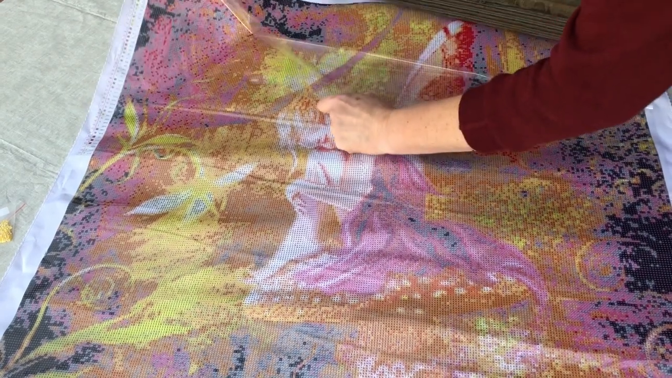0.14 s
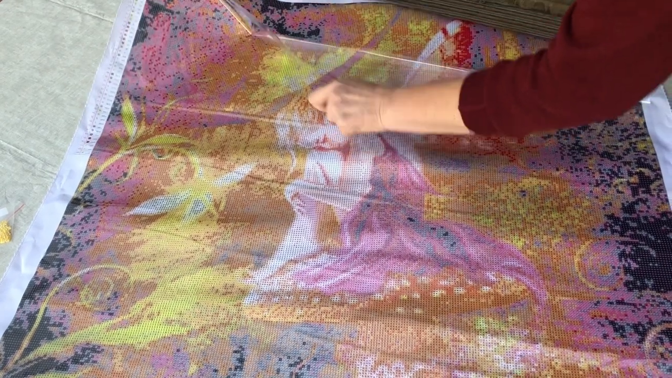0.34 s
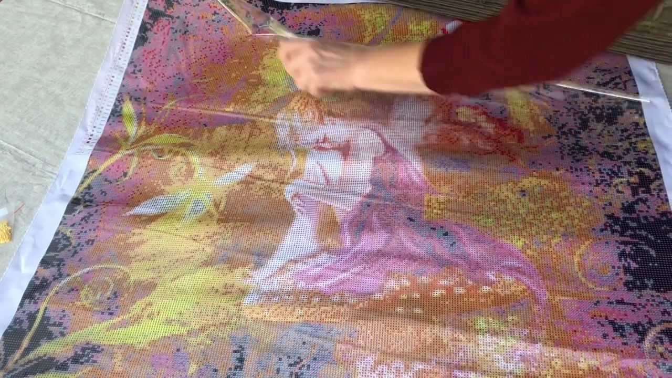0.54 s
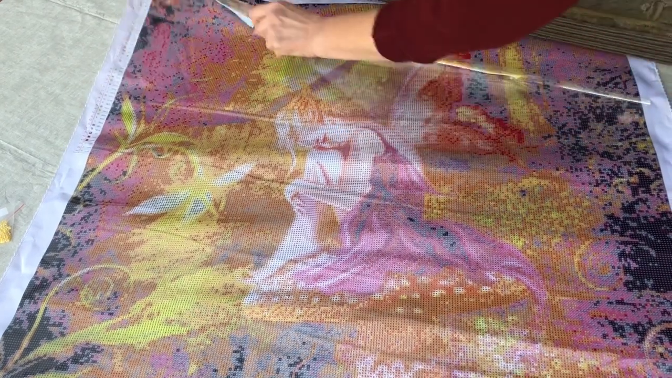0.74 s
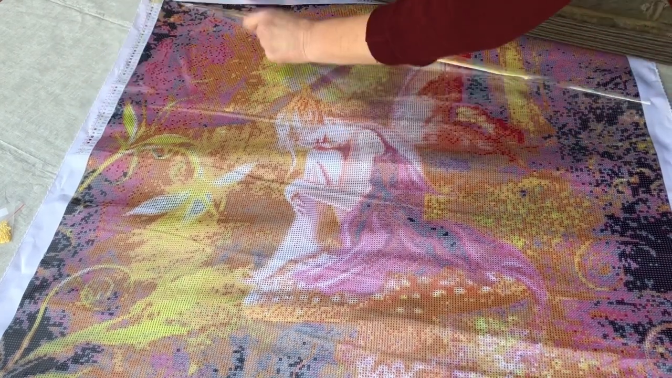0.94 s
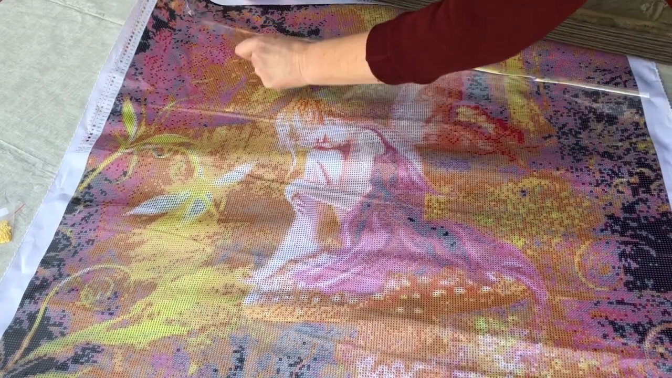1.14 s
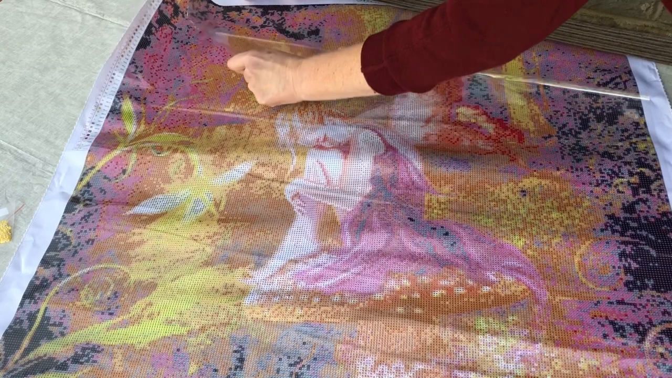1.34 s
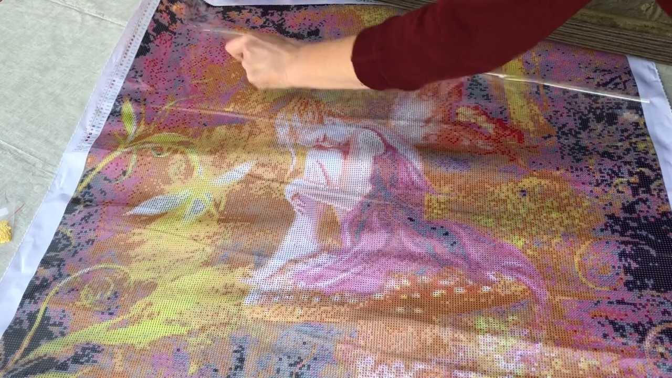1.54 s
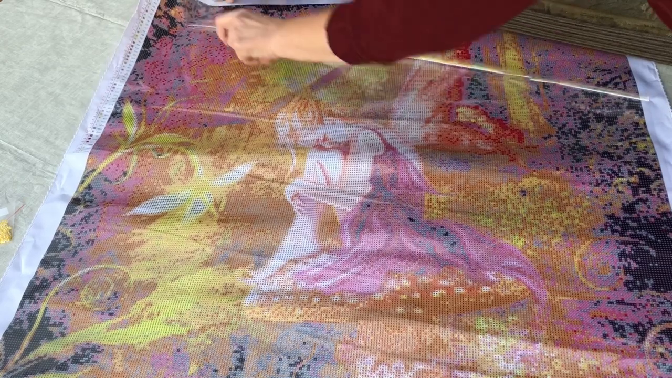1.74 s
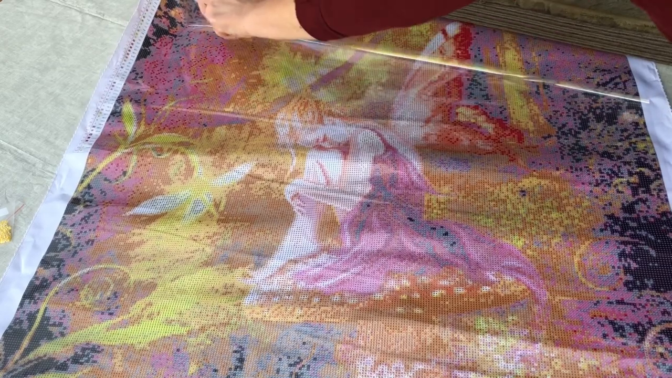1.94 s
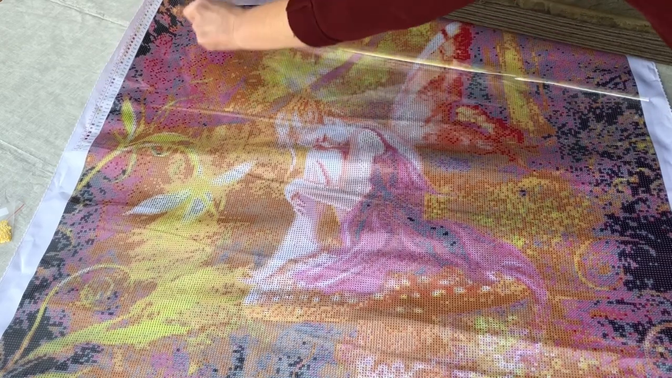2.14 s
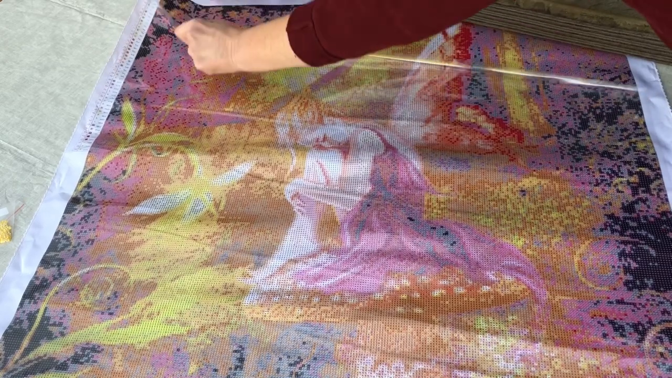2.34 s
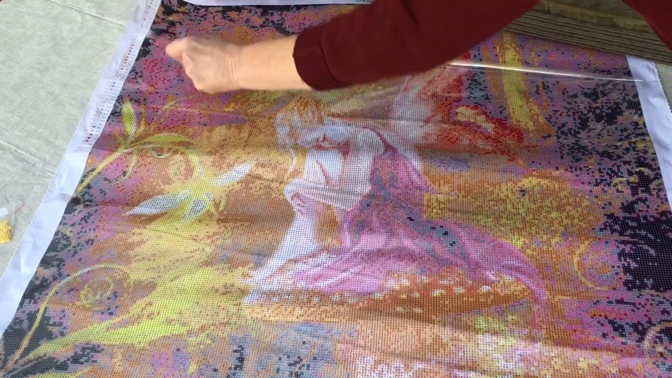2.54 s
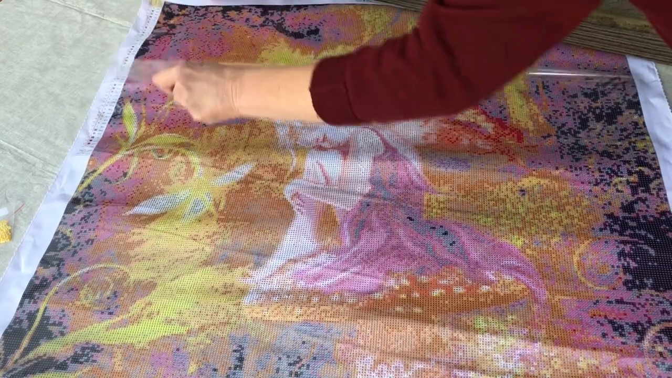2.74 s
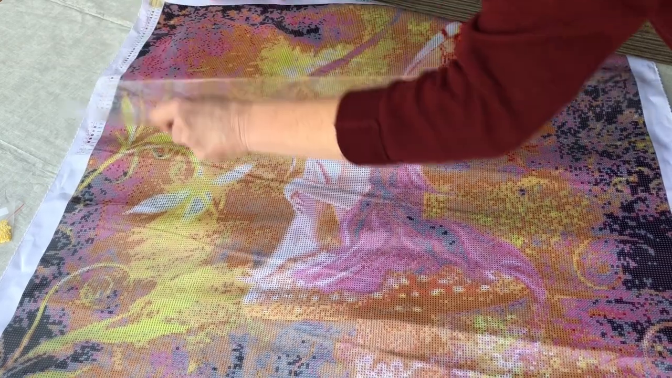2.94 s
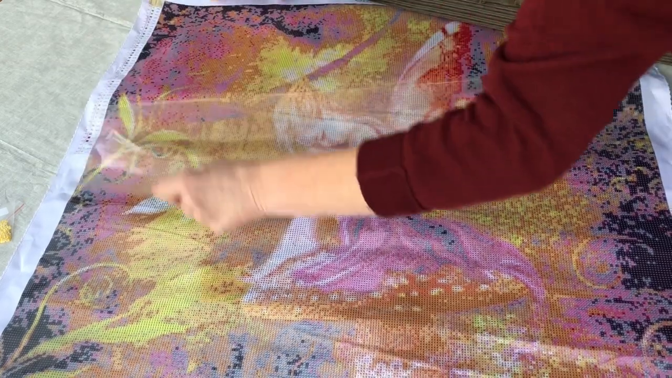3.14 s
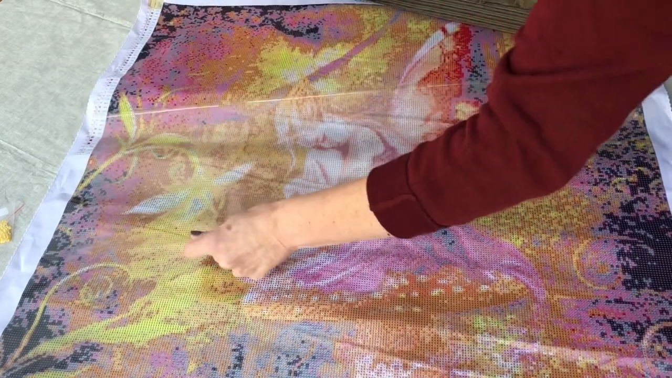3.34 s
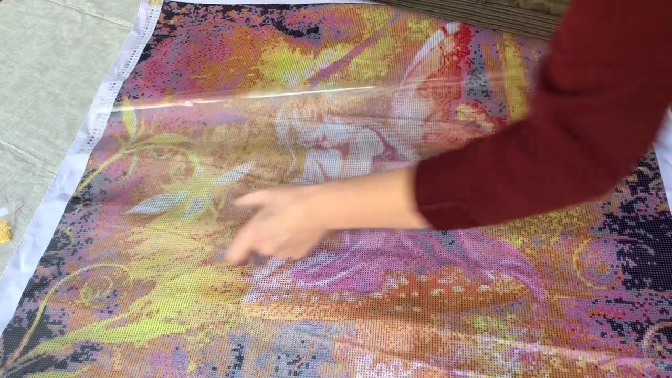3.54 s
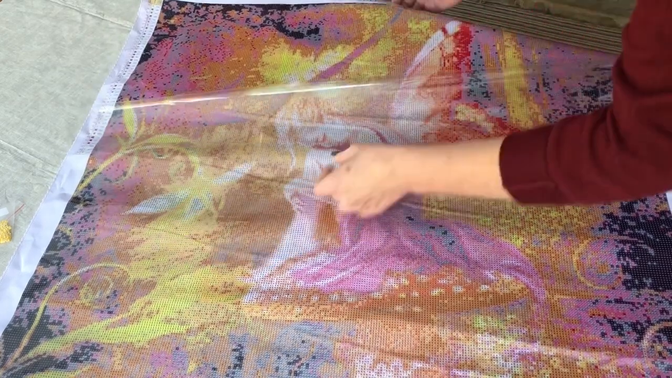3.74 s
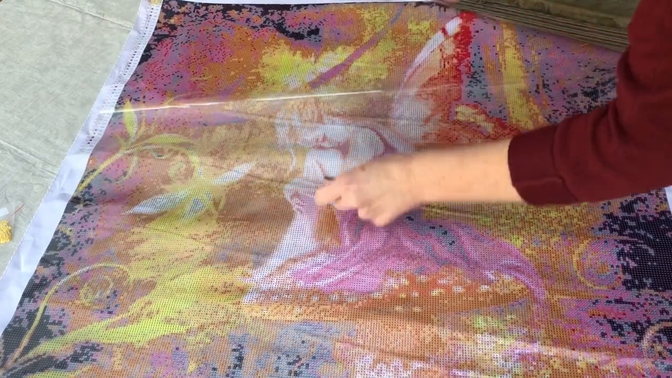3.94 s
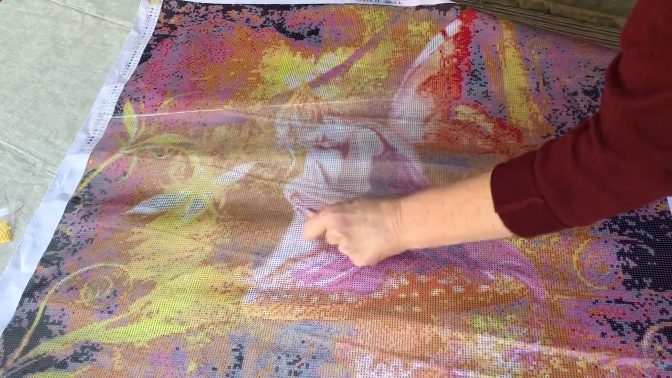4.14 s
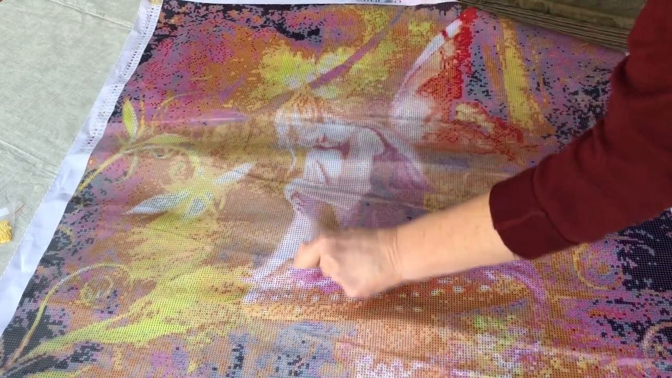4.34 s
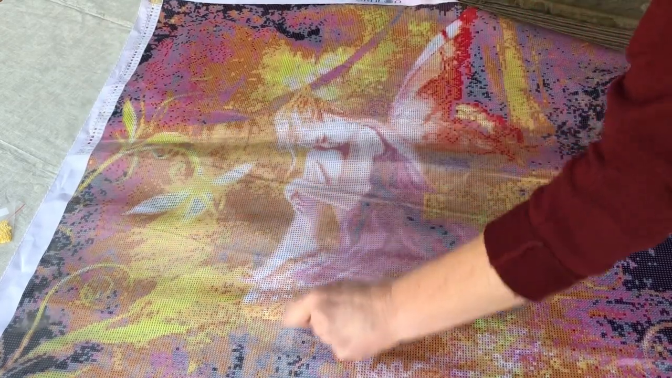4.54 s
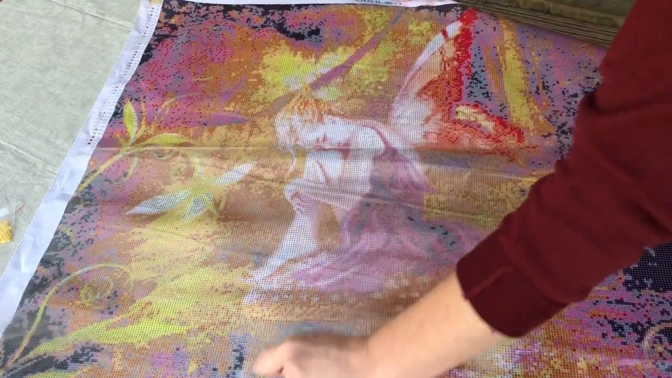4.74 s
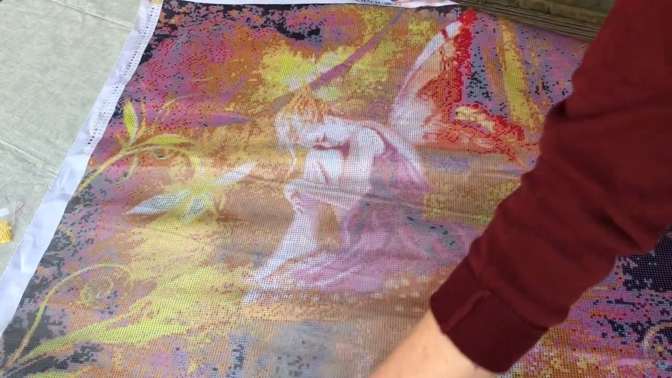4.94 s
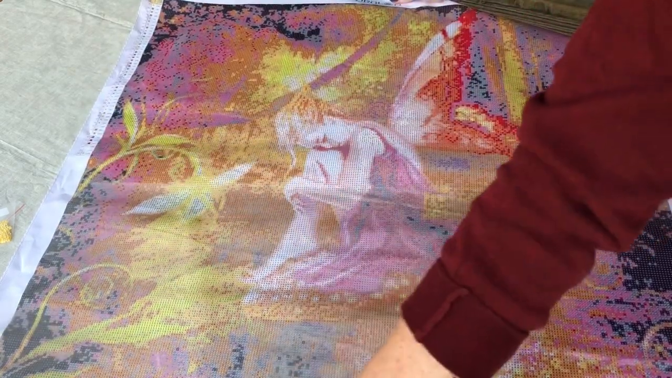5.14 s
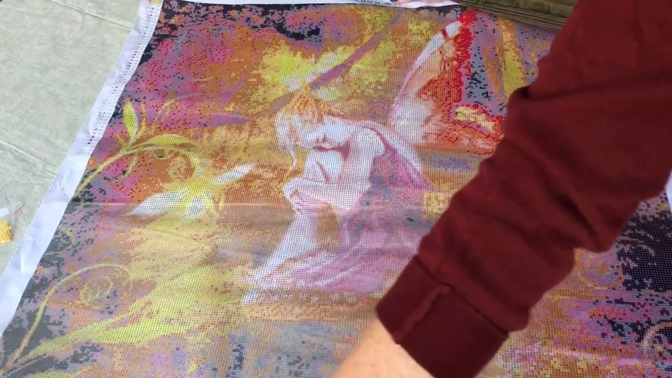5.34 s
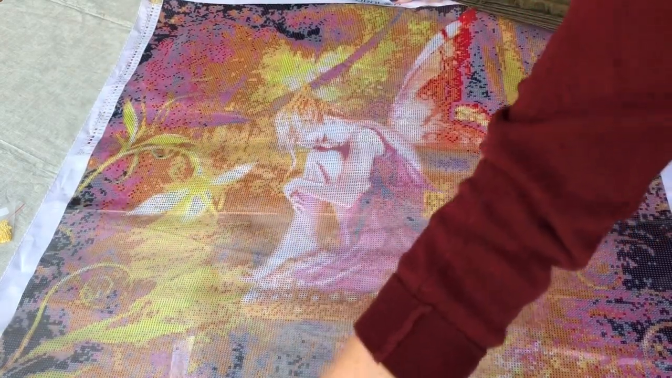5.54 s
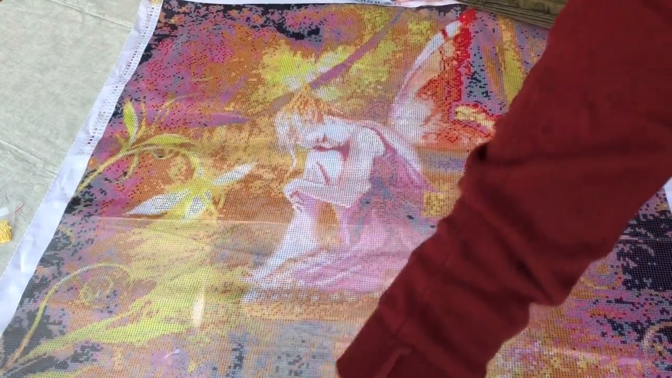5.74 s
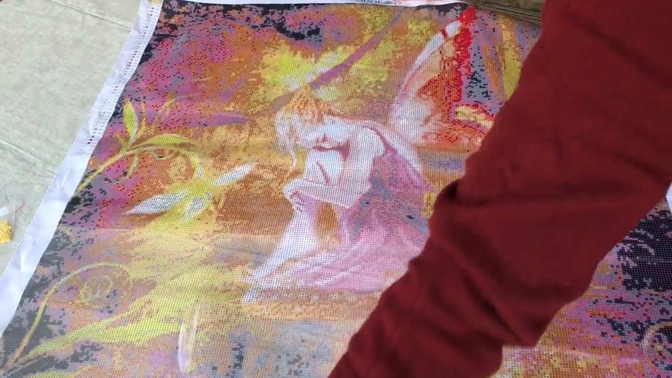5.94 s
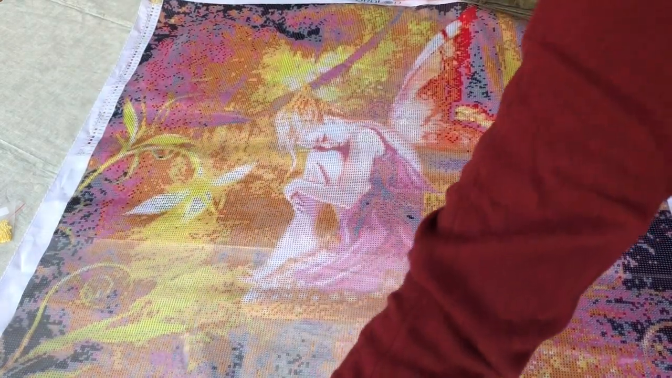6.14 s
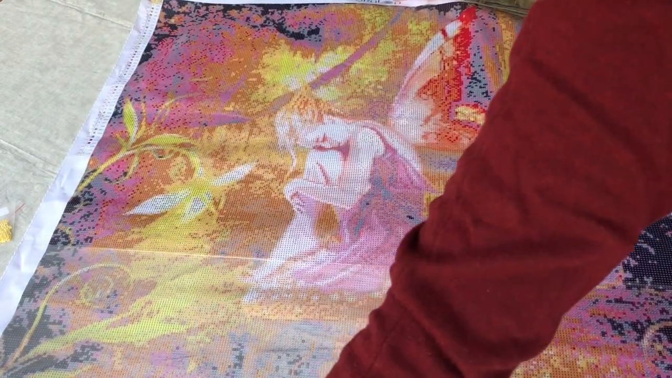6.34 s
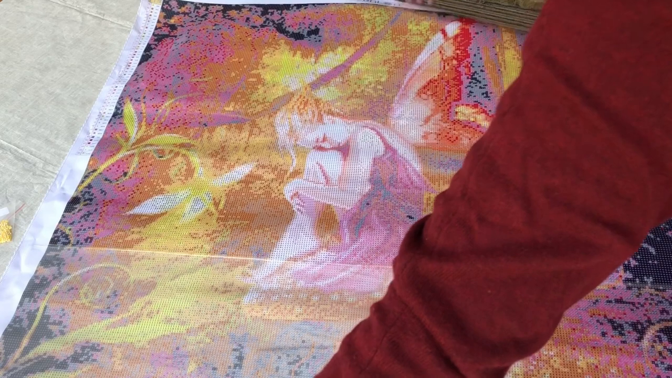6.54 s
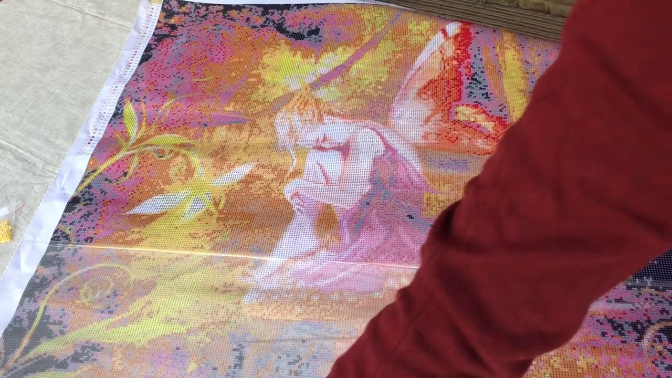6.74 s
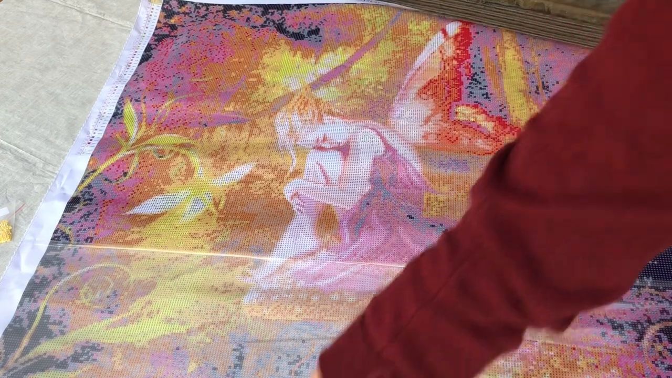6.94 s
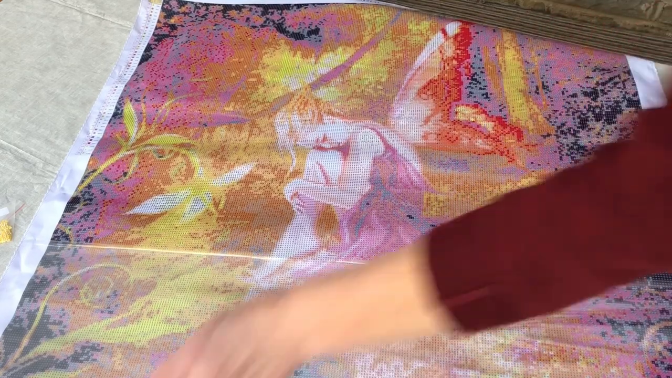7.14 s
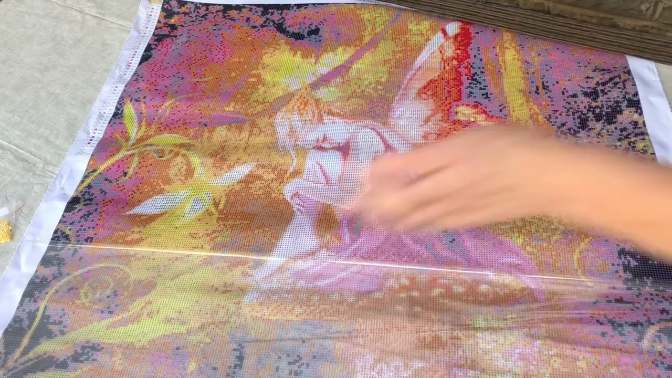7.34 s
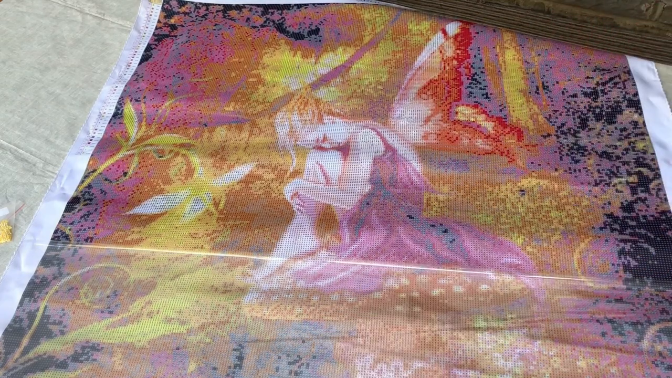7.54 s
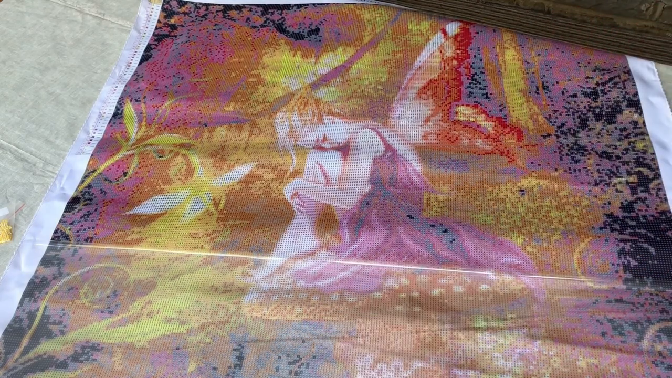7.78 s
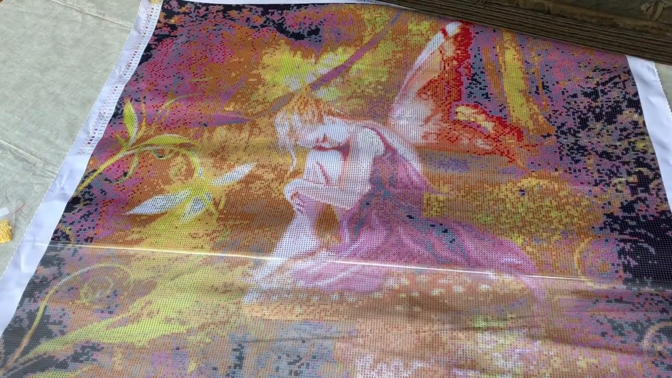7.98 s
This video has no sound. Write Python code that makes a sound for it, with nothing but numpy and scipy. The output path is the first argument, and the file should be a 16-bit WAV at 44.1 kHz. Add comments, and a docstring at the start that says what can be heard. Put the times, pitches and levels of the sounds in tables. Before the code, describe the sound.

Close pickup of thick plastic film being peeled from a sticky canvas in a small quiet room with a short, light reverberation. From 0 to 0.7 s there is grainy glue crackle and scattered snaps; a loud crack at 0.75 s opens a dense run of bright, hard pops, sharpest between 1.1 and 1.6 s, with another strong one at 2.04 s. Snaps then become smaller and duller. Sticky crackling swells around 2.7 s and again, coarser and slacker, at 3.2-3.5 s and 4.1 s, with a short rip near 3.9 s. From 4.3 to 5.6 s it is sparser, fine ticking with irregular pops. At 5.7-6.8 s the loose sheet folds over with low, soft air pushes, crisp snaps and little rips, a bright crack at 6.42 s. Peeling stops by 7 s; cloth brushes softly at 7.2 and fainter at 7.5 s, then only faint room tone until 8 s.

```python
"""Peeling film

A hand peels a thick plastic film off a sticky canvas on a table in a small quiet room.
Creases snap: a noise-burst crack, then a thump through the sheet's modes. The glue line crackles
as random slips and rips in dense runs. Shaped noise makes the flapping sheet, its fold-overs, the
brushing sleeve and the room tone; decaying sparse taps make the room answer snaps and glue.
"""
import sys
import numpy as np
from scipy import signal
from scipy.fft import rfft, irfft, next_fast_len
from scipy.io import wavfile
from scipy.ndimage import uniform_filter1d

SR = 44100
rng = np.random.default_rng(int(sys.argv[2]) if len(sys.argv) > 2 else 0)


def file_out(sig):
    """Save sig as 16-bit WAV at sys.argv[1]."""
    # one column per channel
    cols = np.atleast_2d(sig).T
    # limit, then scale
    lim = np.clip(cols, -1, 1)
    pcm = np.round(lim * 32767).astype(np.int16)
    wavfile.write(sys.argv[1], SR, pcm)


N = 353234
TIME_S = np.arange(N) / SR


def gain_of(db):
    """Decibels to amplitude gain."""
    return 10 ** (np.asarray(db) / 20)


def evened(x):
    """Scales to rms 1."""
    return x / np.sqrt(np.mean(x ** 2) + 1e-20)


def read(points, hz):
    """Interpolates a spectrum table on a log-frequency axis."""
    table_hz, value = np.transpose(points)
    return np.interp(np.log(hz + 1), np.log(table_hz + 1), value)


def follow(rows, column):
    """One column of a time curve at every sample."""
    rows = np.asarray(rows)
    return np.interp(TIME_S, rows[:, 0], rows[:, column])


def coloured(points):
    """Steady noise of rms 1 with the given spectrum."""
    size = next_fast_len(N)
    spectrum = rfft(rng.standard_normal(size))
    spectrum *= gain_of(read(points, np.fft.rfftfreq(size, 1 / SR)))
    return evened(irfft(spectrum, size)[:N])


def band(x, hz, spread):
    """Broad band around hz, falling gently on both sides."""
    edges_hz = [hz / spread, min(hz * spread, SR / 2.1)]
    return signal.sosfilt(signal.butter(1, edges_hz, "band", fs=SR, output="sos"), x)


def band_twice(x, hz, spread):
    """The same band in two passes, for steeper sides."""
    return band(band(x, hz, spread), hz, spread)


def burst(noise, rise_s):
    """A very short broadband burst: a quick swing, its spectrum partly evened, with a faint after-rattle."""
    rattle_share, rattle_s = 0.085, 0.003
    t = np.arange(len(noise)) / SR
    z = rfft(noise * t * np.exp(-t / rise_s))
    swing = irfft(z / (abs(z) + 1e-12) ** 0.12)
    swing *= np.clip(t / 0.0001, 0, 1) * np.exp(-t / (2.0 * rise_s))
    rattle = noise[::-1] * np.exp(-t / rattle_s) * (t > 0)
    return swing / np.linalg.norm(swing) + rattle_share * rattle


# one narrow, longer-ringing low mode near 200 Hz, then broad, brief film modes:
# mode_hz [Hz], width_hz [Hz], level_db [dB, relative]
SHEET_MODES = [(200, 3.8, 5), (434, 230, -3), (690, 540, -4), (1146, 510, -1), (1544, 680, 3.5),
               (2470, 2300, -7.5)]


def sheet(x):
    """Two-pole resonators: one narrow, longer-ringing low mode, then broad, brief film modes."""
    out = np.zeros(len(x))
    for mode_hz, width_hz, level_db in SHEET_MODES:
        r = np.exp(-np.pi * width_hz / SR)
        poles = [1, -2 * r * np.cos(2 * np.pi * mode_hz / SR), r * r]
        out += gain_of(level_db) * (1 - r) * signal.lfilter([1, 0, -1], poles, x)
    return out


def crackles(per_s, spread_db, clump):
    """Random glue slips, most small and a few large, in clumps; longer shapes are more coloured."""
    busy = np.exp(clump * evened(uniform_filter1d(rng.standard_normal(N), 500)))
    size = gain_of(spread_db * np.minimum(rng.exponential(1, N), 4))
    size *= rng.random(N) < per_s / SR * busy / busy.mean()
    shapes = 24
    kind = rng.integers(0, shapes, N)
    slips = np.zeros(N)
    for k in range(shapes):
        shape = burst(rng.standard_normal(96), 0.0001 + 0.00028 * k / shapes)
        slips += signal.oaconvolve(size * (kind == k), shape)[:N]
    # slow loudness drift levelled out
    local_power = uniform_filter1d(slips ** 2, 9000)
    return slips / np.sqrt(local_power + 0.00086 * np.mean(slips ** 2))


# glue line letting go: start_s [s], level_db [dB, before PEEL_GAIN_DB],
# fine_db [dB, fine over coarse crackles], slack [0-1, deepens the coarse ones]
PEEL_CURVE = [(0.0, -50, -7, 0.5), (0.08, -61, -2.5, 0.53), (0.35, -53.5, -8.5, 0.6),
              (1.22, -53, 1.5, 0.45), (2.0, -62, 0, 0.7), (2.47, -57, -4.5, 0.4), (2.67, -48, -7, 0.72),
              (3.02, -56, 2.5, 0.6), (3.18, -61, -5, 0.9), (3.21, -44.5, -16.5, 0.51),
              (3.5, -47.5, -19, 0.76), (3.6, -57, -5, 0.72), (4.12, -47.5, -9.5, 0.33),
              (4.28, -58, -0.5, 0.61), (4.99, -58, 2, 0.16), (6.18, -53, -3, 0.4),
              (6.42, -47.5, -4.5, 0.64), (6.69, -53, -7, 0.55), (7.05, -66.5, -16, 0.6)]
PEEL_GAIN_DB = 4.0


def peel():
    """Coarse slips ring the sheet, deeper when it hangs slack; fine ones tick over a hiss of countless slips."""
    spread = 1.8
    coarse = sheet(crackles(1600, 3.4, 0.6))
    deep = evened(band_twice(coarse, 1100, 1.7))
    taut = evened(band_twice(coarse, 1900, 1.7))
    body = gain_of(-11.5) * evened(band(coarse, 520, spread))

    ticks = evened(band_twice(crackles(400, 5.9, 1.1), 3200, spread))
    swell = 1 + 0.19 * evened(uniform_filter1d(abs(ticks), 300))
    hiss = evened(band(rng.standard_normal(N) * swell, 9000, 2.0 * spread))
    fine = gain_of(follow(PEEL_CURVE, 2)) * (ticks + gain_of(-4.0) * hiss)

    slack = np.clip(follow(PEEL_CURVE, 3), 0, 1)
    mix = slack * deep + (1 - slack) * taut + body + fine
    held = np.clip((PEEL_CURVE[-1][0] - TIME_S) / 0.18, 0, 1)  # the hand lets go
    return gain_of(PEEL_GAIN_DB) * held * gain_of(follow(PEEL_CURVE, 1)) * mix


# loose sheet pushing air: start_s [s], level_db [dB, before lumps]
FLAP_CURVE = [(0.0, -61.5), (1.3, -59), (2.2, -63.5), (2.76, -74), (3.8, -67), (4.6, -65), (5.61, -64),
              (5.8, -56.5), (6.12, -58), (6.3, -54.5), (6.8, -56.5), (6.9, -70.5), (8.0, -86)]
# spectrum of the pushed air: freq_hz [Hz], density_db [dB per Hz, relative]
FLAP_SPECTRUM = [(25, -38), (50, -5), (85, -12), (170, 2.5), (300, -2), (650, -10.5), (1500, -41)]
# free end folds over: start_s [s], peak_db [dB]
FOLDS = [(5.715, -47), (5.875, -59), (6.255, -49), (6.55, -50.5), (6.74, -49.5)]


def flap():
    """The loose sheet pushes air: low lumpy noise, with a quick push that dies more slowly at each fold."""
    lumps_db, push_peak_s = 1.5, 0.013
    lumps = evened(uniform_filter1d(rng.standard_normal(N), size=1500))
    level = gain_of(follow(FLAP_CURVE, 1) + lumps_db * lumps)
    for start_s, peak_db in FOLDS:
        u = np.maximum(TIME_S - start_s, 0) / push_peak_s
        level += gain_of(peak_db) * u * np.exp(1 - u)
    return level * coloured(FLAP_SPECTRUM)


# room tone spectrum: freq_hz [Hz], density_db [dB per Hz, relative]
AIR_SPECTRUM = [(18, -30), (30, -2), (75, -0.5), (415, -5), (2010, -13), (9220, -18), (14400, -20.5),
                (16000, -20.5)]


def room_tone():
    """Steady coloured noise of the quiet room."""
    return gain_of(-68.5) * coloured(AIR_SPECTRUM)


# decay of the room: freq_hz [Hz], t60_s [s]
ROOM_DECAY = [(150, 0.41), (660, 0.32), (1740, 0.23), (4590, 0.3), (12100, 0.2)]


def room(x):
    """Sparse-tap tails, highs and lows decaying apart; three take turns so that snaps ring differently."""
    out, size = np.zeros(N), SR // 2
    t = np.arange(size) / SR
    for k in range(3):
        at = np.arange(0, size - 10, 10)
        at += rng.integers(0, 10, len(at))
        taps = np.zeros(size)
        taps[at] = rng.choice([-1., 1.], len(at)) * gain_of(4.6 * rng.standard_normal(len(at)))
        hz, frame_s, z = signal.stft(taps, SR, nperseg=256)
        decay = gain_of(-60 * frame_s / read(ROOM_DECAY, hz)[:, None])
        tail = signal.istft(z * decay, SR, nperseg=256)[1][:size]
        tail *= np.clip((t - 0.002) / 0.01, 0.4, 1)  # table first, walls later
        share = np.sqrt(2 / 3) * np.cos(np.pi * (9.0 * TIME_S + k / 3))
        out += gain_of(-2.0) * signal.oaconvolve(x * share, tail / np.linalg.norm(tail))[:N]
    return out


def snap(crack, thump, crack_hz, thump_db):
    """Bands the crack, rings the sheet with the thump, adds them at unit crack energy."""
    crack, thump = band_twice(crack, crack_hz, 1.9), sheet(thump)
    return crack / np.linalg.norm(crack) + gain_of(thump_db) * thump / np.linalg.norm(thump)


# creases popping over: start_s [s], crack_db [dB, energy], thump_db [dB over the crack, before
# body_db], crack_hz [Hz, centre]
SNAP_EVENTS = [(0.1286, -9.5, -3.5, 4200), (0.2004, -21.5, 3.5, 3300), (0.2781, -26.5, 16, 4100.0),
               (0.3821, -0.5, -10, 4800), (0.4589, -3.5, -4, 6800), (0.4632, -16.5, 11.5, 5900.0),
               (0.5755, -9.5, 5, 4840), (0.6821, -11, 5, 6100), (0.7114, -28, 12, 4900.0),
               (0.721, -30.5, 18.5, 4100.0), (0.7462, -21, 12, 6100.0), (0.751, 9, -5, 6440),
               (0.7599, -2, 1, 6100.0), (0.7742, 2.5, -5, 6800.0), (0.8134, -5, 2, 4340),
               (0.839, -12, 5, 6100.0), (0.8892, -16.5, 2, 4370), (0.971, -12, -6.5, 4960),
               (0.994, -13, -4, 7200), (1.0326, -6.5, -0.5, 5000), (1.0903, -24, 3, 4700.0),
               (1.1043, -7.5, -0.5, 5700), (1.118, -9, -8, 6700), (1.1322, -2.5, -16, 6260),
               (1.138, -14.5, 4.5, 7800.0), (1.164, -7.5, -11, 5650), (1.18, -3, -20, 7700),
               (1.194, -5, -9, 11200.0), (1.199, -3.5, -11.5, 5170), (1.208, -6.5, -10.5, 10200.0),
               (1.2183, -3.5, -8.5, 6600), (1.2261, -10, -12, 7400), (1.2508, 6.5, -17, 10050),
               (1.276, 2, -9, 8900), (1.2965, -4.5, -15, 11300.0), (1.401, -0.5, -19, 7700),
               (1.4072, -14, -3, 7500.0), (1.519, -6, -8, 4430), (1.5431, 6.5, -9.5, 7200),
               (1.587, 5.5, -10.5, 7900), (1.6471, -18.5, -1, 5500), (1.7132, -25.5, 5, 4700.0),
               (1.759, -9.5, 0, 6050), (1.931, -8.5, -3.5, 5740), (1.9479, -20.5, 6, 5700.0),
               (1.9855, -23, 6, 8200.0), (2.0416, 2, -2.5, 7950), (2.0911, -12, 1.5, 6400),
               (2.1855, -21.5, 1.5, 5100.0), (2.2075, -25.5, 11.5, 5130), (2.2614, -12, -8.5, 6200),
               (2.3668, -15, -1.5, 5200), (2.4282, -18.5, 2, 8540), (2.4375, -14.5, -6.5, 4950),
               (2.5146, -36, 18, 3740), (2.5434, -25, 7, 5300.0), (2.569, -21, 9.5, 4830),
               (2.5857, -26.5, 15, 4500.0), (2.658, -30.5, 13.5, 4200.0), (2.7027, -26, 6, 4400.0),
               (2.713, -31, 18, 4900.0), (2.777, -7.5, -11, 10200), (2.8071, -8.5, -10.5, 6650),
               (2.8281, -20, 9, 6560), (2.9126, -6, -8.5, 4900), (2.9596, -14.5, 1, 5260),
               (3.0128, -21.5, 3, 6440), (3.0439, -28.5, 15, 4200.0), (3.128, -21, 3, 4470),
               (3.1716, -32, 4, 4500.0), (3.2725, -30, 15, 3560), (3.2876, -16.5, 1.5, 3650),
               (3.3103, -19, -5, 4700.0), (3.4142, -26, 6, 5470), (3.484, -33, 15.5, 5100.0),
               (3.514, -32.5, 19.5, 4500.0), (3.5583, -31.5, 13.5, 3600.0), (3.6844, -19, -5, 4000.0),
               (3.7062, -10, 0.5, 4770), (3.9067, -17.0, -7, 3560), (3.918, -20.5, -1, 4940),
               (3.945, -36, 29, 4300.0), (3.974, -14.5, 4.5, 5900), (3.991, -18, 0, 3600),
               (4.05, -26, 5, 3300), (4.059, -16.5, -5, 5740), (4.1321, -18.5, 1, 4460),
               (4.1824, -33, 0, 3400.0), (4.199, -40, 22, 4330), (4.2998, -15, -11, 4450),
               (4.3594, -29, 9, 5700.0), (4.403, -24, -10, 6000), (4.465, -31.5, 12.5, 3440),
               (4.52, -25, -5, 3500), (4.5422, -18.5, -3.5, 5800), (4.5582, -22, -15, 6400.0),
               (4.578, -28, -12, 6500), (4.6057, -16.5, -32, 6160), (4.616, -13.5, -18, 5500),
               (4.738, -33.5, 9, 3300), (4.7931, -7.5, -7.5, 4860), (4.803, -15.5, -10, 4300),
               (4.876, -32, 6, 4500), (4.885, -31, 7, 4000), (4.931, -41, 21.5, 4800.0),
               (4.9506, -28, 10, 5000.0), (4.979, -25.5, 4, 6400.0), (5.0186, -17, 1.5, 5200.0),
               (5.0328, -16, -16, 4280), (5.0804, -21.5, 3, 5100.0), (5.137, -15.5, -9, 6200.0),
               (5.176, -13, 0, 5400), (5.19, -23, 8.5, 5940), (5.213, -25, 11.5, 5230),
               (5.2786, -14.0, 2, 5600.0), (5.3089, -19.5, 5, 4300.0), (5.4197, -20, 2, 4100.0),
               (5.479, -12.5, -5, 5030), (5.491, -26.5, 7, 3000), (5.5241, -18, 0.5, 6200),
               (5.5382, -20.5, 6.5, 6600), (5.5485, -6.5, -32, 4840), (5.6334, -19.5, -27, 5600.0),
               (5.685, -21.5, 9, 5360), (5.7222, -3.5, -4, 6700), (5.796, -19, 0, 4500.0),
               (5.8822, -32, 18.5, 3600.0), (5.9633, -31, 17.5, 5000), (6, -17.5, -1.5, 6900),
               (6.08, -22, -7, 4900), (6.0863, -12.5, -5, 4580), (6.163, -20, 4.5, 5300),
               (6.2504, -13, 4, 7050), (6.311, -16.5, 9, 5900.0), (6.3635, -17, -1, 6900.0),
               (6.4048, -16.5, 7.5, 6250), (6.4203, -1, -9, 6860), (6.5459, -21.5, 10, 5300.0),
               (6.6636, -19, 6, 5100), (6.698, -28, -3, 4700.0), (6.724, -14.0, -2, 8500.0),
               (6.76, -27, 15.5, 4330), (6.9342, -38, 3, 4990), (7.04, -40.5, 0, 7250),
               (7.618, -45.5, 2.5, 2400.0)]
# snap colour and reach as the sheet is moved: start_s [s], body_db [dB, extra at 120-450 Hz],
# walls_db [dB, share sent to the walls, before BEAMED_DB and scatter]
SNAP_COLOUR = [(0.0, -6, 1), (0.75, 1.5, 1.5), (1.0, -1, -0.5), (1.55, -13, 1.5), (2.1, 1.5, 1.5),
               (2.8, 7.5, -1.5), (3.9, -7, -1), (4.7, -7, -2.5), (5.7, -7, 2), (6.3, -6, 1.5), (7.0, 13, 3)]
CRACK_RISE_S, THUMP_RISE_S = 0.00018, 0.00079
LAG_S_AT_1KHZ = 0.000812
BEAMED_DB = 6.5  # the crack is beamed, so the walls get less of it
WALLS_SCATTER_DB = 2  # creases face any way


def snaps():
    """A sharp crack, then a thump sliding down as slower low bending waves lag; gives microphone and wall feeds."""
    size = 1024
    near, walls = np.zeros((2, N + size))
    click = signal.unit_impulse(size)
    walls_db = follow(SNAP_COLOUR, 2)
    # delay grows as 1 / sqrt(frequency)
    lag = np.exp(-4j * np.pi * LAG_S_AT_1KHZ * np.sqrt(1000 * np.fft.rfftfreq(size, 1 / SR)))
    for start_s, crack_db, thump_db, crack_hz in SNAP_EVENTS:
        at = round(start_s * SR) - 20
        crack = burst(rng.standard_normal(size), CRACK_RISE_S)
        thump = irfft(rfft(burst(rng.standard_normal(size), THUMP_RISE_S)) * lag)
        near[at:at + size] += gain_of(crack_db) * snap(crack, thump, crack_hz, thump_db)
        # summed over all directions the snap has a smooth spectrum
        sent_db = crack_db + walls_db[at] - BEAMED_DB + WALLS_SCATTER_DB * rng.standard_normal()
        walls[at:at + size] += gain_of(sent_db) * snap(click, click, crack_hz, thump_db + BEAMED_DB)

    body_band = signal.butter(2, [120, 450], "band", fs=SR, output="sos")
    extra = gain_of(follow(SNAP_COLOUR, 1)) - 1
    return [x + extra * signal.sosfiltfilt(body_band, x) for x in (near[:N], walls[:N])]


# strips of glue going at once: start_s [s], length_s [s], level_db [dB, before the envelope], centre_hz [Hz]
RIP_EVENTS = [(0.271, 0.015, -41, 2820), (0.458, 0.011, -26, 4400), (0.68, 0.0098, -34, 5030),
              (0.758, 0.055, -27, 4500), (2.045, 0.0057, -25.5, 1250), (2.566, 0.011, -37.5, 3000),
              (2.826, 0.02, -35, 730), (3.205, 0.0058, -37, 1930), (3.91, 0.098, -34.5, 1430),
              (5.311, 0.022, -38, 2720), (5.859, 0.014, -35, 1770), (6.258, 0.023, -32, 2300),
              (6.302, 0.055, -35, 2700), (6.394, 0.011, -33, 2500), (6.663, 0.012, -32.5, 3880),
              (6.737, 0.049, -33, 1870)]
RIP_RISE_PER_S = 2.6  # longer strips take a larger share of their length to get going


def rips():
    """Dense slips that swell in, slowly for long strips, sag and stop short, each strip in its own band."""
    out, slips = np.zeros(N), crackles(3000, 2.0, 0.5)
    for start_s, length_s, level_db, centre_hz in RIP_EVENTS:
        at = round(start_s * SR)
        u = np.arange(round(0.97 * length_s * SR)) / (length_s * SR)
        strip = evened(band(band(slips[at:at + len(u)], centre_hz, 2.9), centre_hz, 1.62))
        envelope = np.minimum(u / (RIP_RISE_PER_S * length_s), 1) * np.exp(-u ** 2)
        out[at:at + len(u)] += gain_of(level_db) * strip * envelope
    return out


# cloth brushing: centre_s [s], half_length_s [s, to 1/e], peak_db [dB]
SLEEVE_EVENTS = [(7.187, 0.15, -63), (7.502, 0.12, -70)]
# spectrum of the cloth: freq_hz [Hz], density_db [dB per Hz, relative]
SLEEVE_SPECTRUM = [(300, -22), (900, -2), (1500, -2.5), (3000, -7), (16000, -20)]


def sleeve():
    """Cloth brushing: soft bell-shaped swells of coloured noise."""
    level = np.zeros(N)
    for centre_s, half_length_s, peak_db in SLEEVE_EVENTS:
        level += gain_of(peak_db) * np.exp(-((TIME_S - centre_s) / half_length_s) ** 2)
    return level * coloured(SLEEVE_SPECTRUM)


def scene():
    """Film, its room, the sleeve and the room tone."""
    near, walls = snaps()
    glue = peel() + rips()
    answer = room(walls + gain_of(-3.0) * glue)
    return (near + glue + answer + flap() + sleeve() + room_tone())[None]


def record(dry):
    """The microphone drops the deepest bass and rounds off the loudest peaks; then a band limit."""
    low_cut_hz, edge_hz, top = 42, 15900, 0.95
    heard = signal.sosfilt(signal.butter(4, low_cut_hz, "high", fs=SR, output="sos"), dry)
    heard = top * np.tanh(heard / top)
    limit = signal.firwin(255, edge_hz, window=("kaiser", 9), fs=SR)
    return signal.oaconvolve(heard, limit[None], "same")


dry = scene()
out = record(dry)
file_out(out)
```